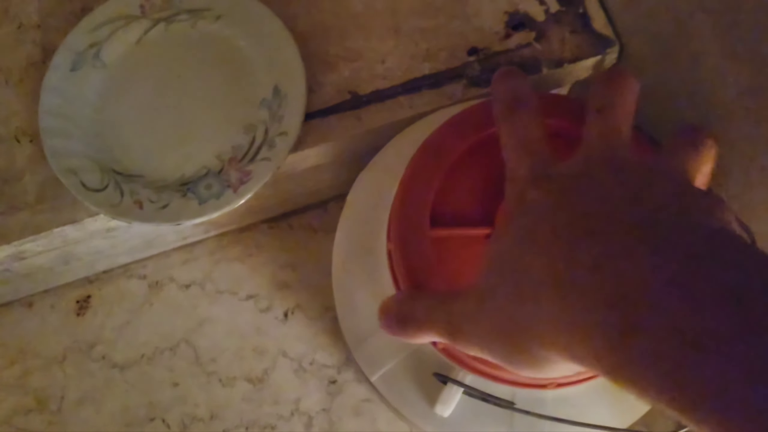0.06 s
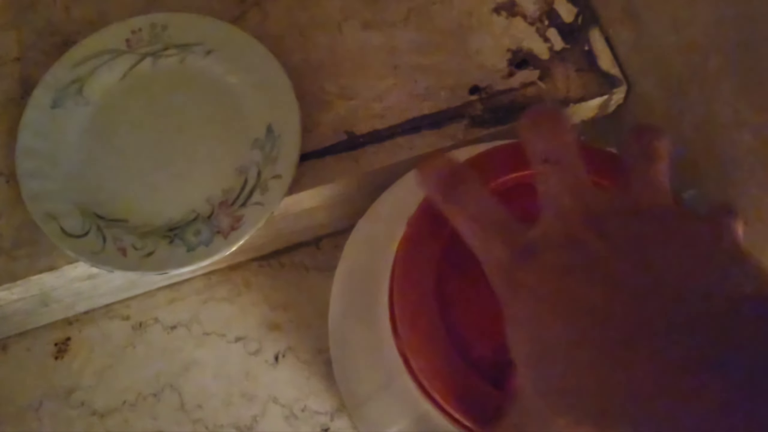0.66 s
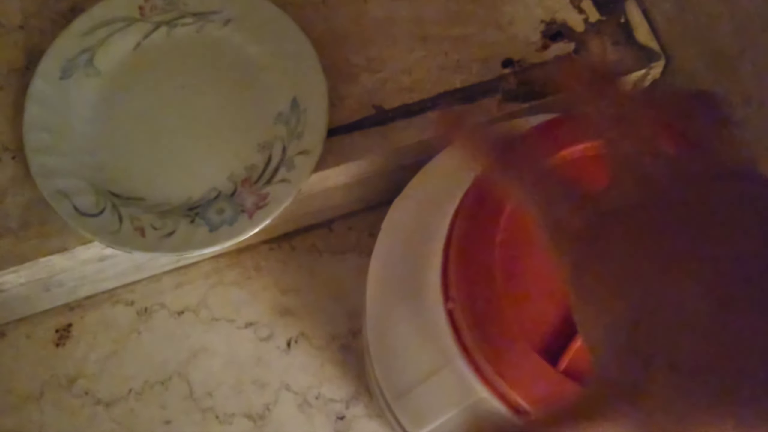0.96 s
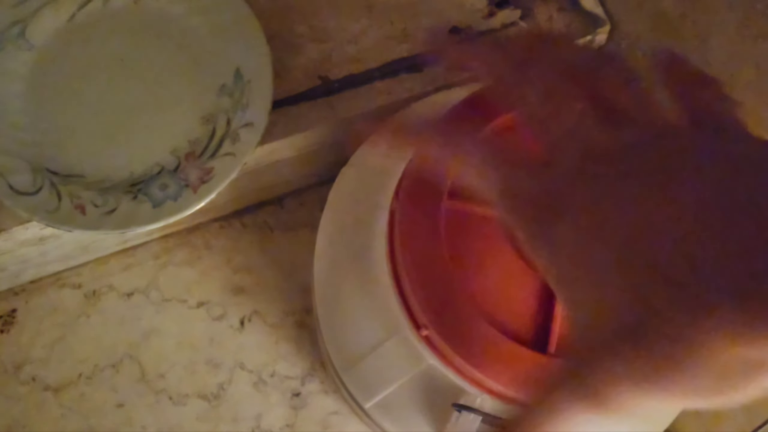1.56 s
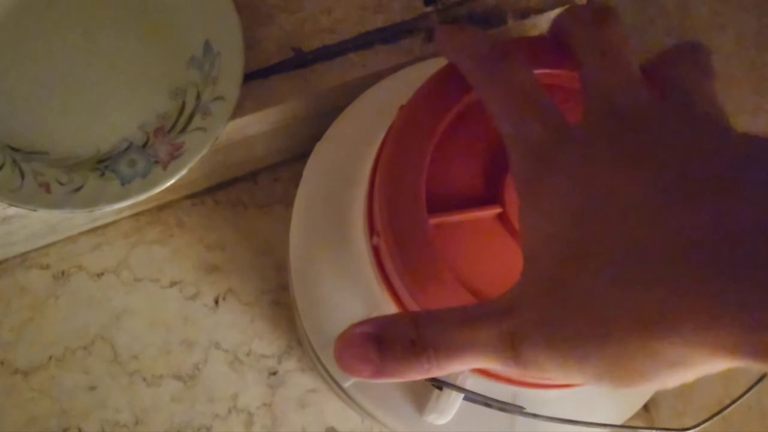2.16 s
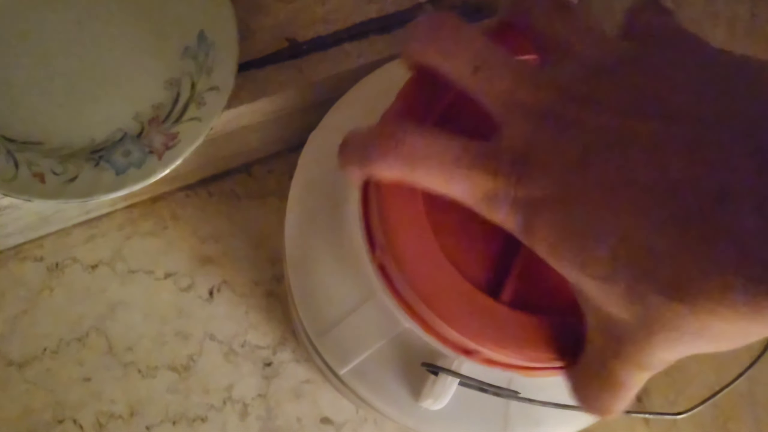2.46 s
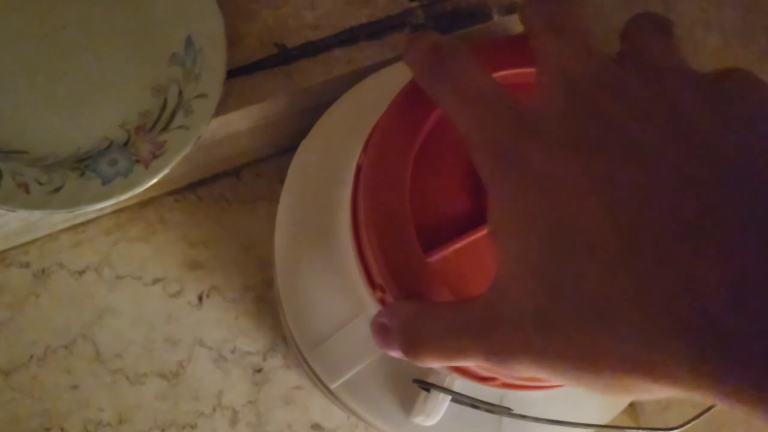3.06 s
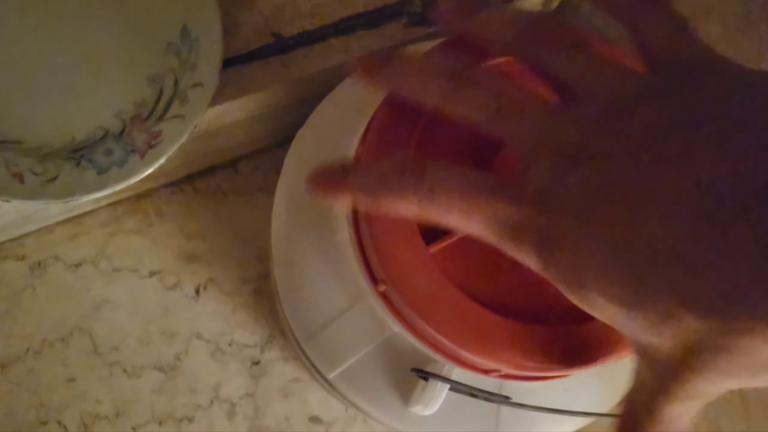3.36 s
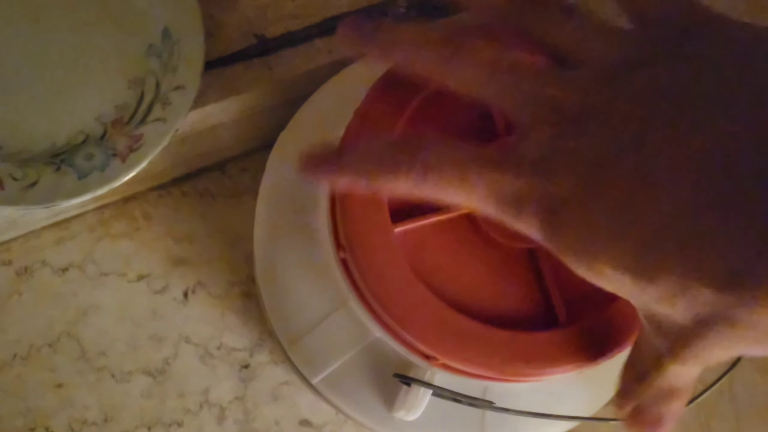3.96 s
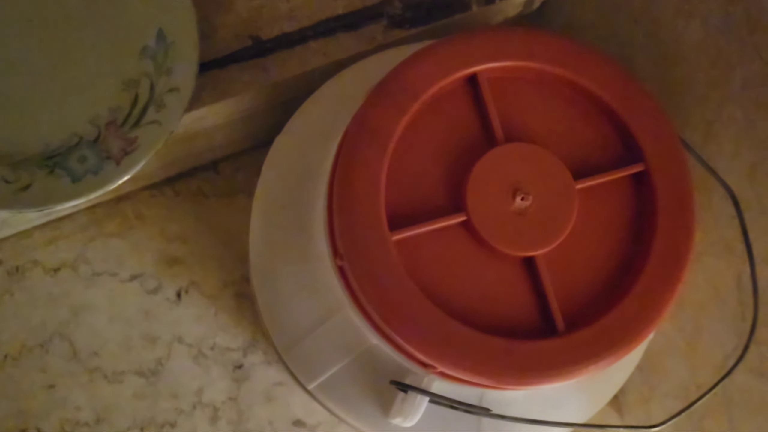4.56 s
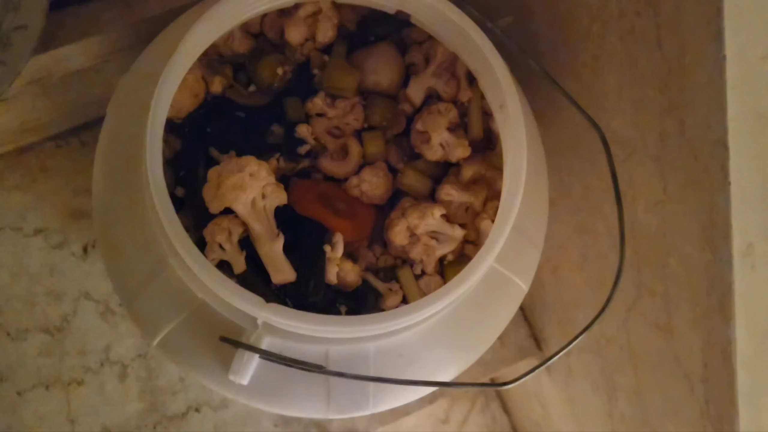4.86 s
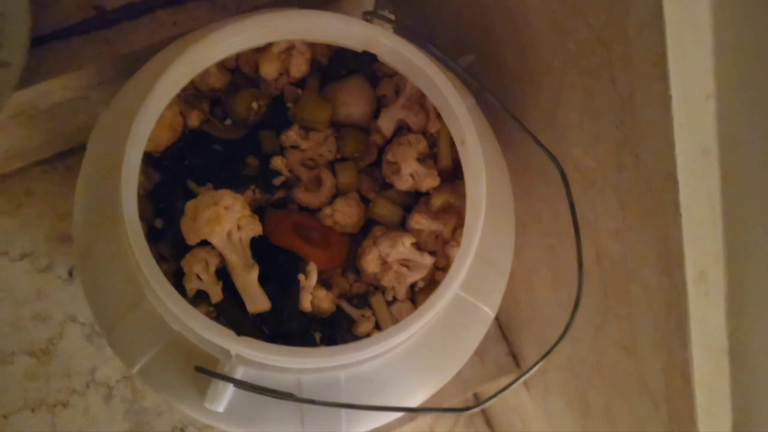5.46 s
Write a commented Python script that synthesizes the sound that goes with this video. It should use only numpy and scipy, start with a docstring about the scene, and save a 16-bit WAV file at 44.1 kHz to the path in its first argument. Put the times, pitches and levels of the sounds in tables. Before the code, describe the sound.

From the start, a hand rummages through dry snack pieces in a plastic jar on a kitchen counter, close to the microphone and a little left. Runs of short pushes come about every half second, the pieces scraping and crunching against the hollow wall. The jar rumbles on the counter and is bumped repeatedly, with clacks, thumps and low booms, the strongest near 2.2 seconds. A piece snaps with a bright tick around 2.4 seconds. The rummaging ends at about 4 seconds, and the hand withdraws with a soft, crumbly rustle on the right. There, from about 4.3 to 4.9 seconds, a few pieces click lightly on a ceramic plate, which rings faintly and thuds softly on the counter. Faint finger rubbing follows until around 5.5 seconds. A short room echo, a low hush and a faint thin whine sit behind everything.

```python
"""At a kitchen counter, microphone close to a plastic jar of dry snack pieces, the jar a little to the left.
A hand rummages in runs of short pushes: the pieces scrape and ring the wall, and the jar rumbles on the
counter, is bumped and booms. Then the hand withdraws with a soft rustle on the right, where a few pieces
click on a ceramic plate. Behind it all are a short room echo, a low hush and a faint whine."""
import sys
import numpy as np
from scipy import signal
from scipy.fft import rfft, irfft, next_fast_len
from scipy.io import wavfile
from scipy.ndimage import uniform_filter1d, map_coordinates

SR = 44100
rng = np.random.default_rng(int(sys.argv[2]) if len(sys.argv) > 2 else 0)


def waveform_to_disk(signal):
    """Save audio, clipped to [-1, 1], as 16-bit WAV at the path in sys.argv[1]."""
    frames = np.transpose(np.atleast_2d(signal))
    scaled = np.clip(frames, -1, 1) * 32767
    samples = np.round(scaled).astype(np.int16)
    wavfile.write(sys.argv[1], SR, samples)


N = 242550


def amp(db):
    """Decibels to gain."""
    return 10 ** (np.asarray(db) / 20)


def unit(x):
    """Scaled to rms 1."""
    return x / np.sqrt(np.mean(x ** 2) + 1e-20)


def along(points, hz):
    """Read (freq_hz, value) points on a log frequency axis."""
    freqs, values = np.transpose(points)
    return np.interp(np.log(hz + 1), np.log(freqs + 1), values)


def wobble(knots_per_s):
    """A smooth random curve."""
    return map_coordinates(rng.standard_normal(4096), [np.arange(N) * knots_per_s / SR], mode="wrap")


def filtered(x, response):
    """x through a complex response of frequency."""
    n = x.shape[-1]
    padded = 2 * next_fast_len(n // 2 + 4096)
    return irfft(rfft(x, padded) * response(np.fft.rfftfreq(padded, 1 / SR)), padded)[..., :n]


def colour(points):
    """Causal response through (freq_hz, level_db) points."""
    def response(hz):
        cepstrum = irfft(np.log(amp(along(points, hz))))
        cepstrum[1:len(cepstrum) // 2] *= 2
        cepstrum[len(cepstrum) // 2 + 1:] = 0
        return np.exp(rfft(cepstrum))
    return response


def resonances(modes):
    """Response of (pitch_hz, width_hz, level_db) modes of alternating sign, each with its bass cut."""
    def response(hz):
        total = 0
        for k, (pitch, width, db) in enumerate(modes):
            peak = pitch * width / (pitch ** 2 - hz ** 2 + 1j * hz * width)
            bass_cut = 1j * hz / (pitch / 2 + 1j * hz)
            total += (-1) ** k * amp(db) * peak * bass_cut
        return total
    return response


def add(track, start_s, sound):
    """Mix a sound into the track."""
    part = track[..., max(round(start_s * SR), 0):][..., :sound.shape[-1]]
    part += sound[..., :part.shape[-1]]


def grains(per_s, scatter_db):
    """Tiny random contacts; each takes two paths to the microphone, with its own strength on each."""
    hits = rng.random(N) < per_s / SR
    return hits * amp(scatter_db * rng.standard_normal(N)) * rng.standard_normal((2, N))


def burst(response, t60_s, rise_s):
    """A short crush of noise through a response; its loudest 5 ms have rms 1."""
    t = np.arange(SR // 5) / SR
    envelope = amp(-60 * t / t60_s) * (1 - np.exp(-t / rise_s))
    noise = filtered(rng.standard_normal((2, len(t))) * envelope, response)
    power = uniform_filter1d(noise ** 2, size=220, mode="constant")
    return noise / np.sqrt(power.max(1, keepdims=True))


def thump(pitch_hz, t60_cycles, rise_cycles):
    """A soft push that swings for a few cycles, peak 1."""
    cycles = pitch_hz * np.arange(SR // 5) / SR
    envelope = amp(-60 * cycles / t60_cycles) * (1 - np.exp(-(cycles / rise_cycles) ** 2))
    swing = -np.sin(2 * np.pi * cycles) * envelope
    return swing / np.abs(swing).max()


def swell(start_s, rise_s, hold_s, fall_db_per_s):
    """Gain of one gesture, every 32nd sample: a smooth rise, a hold and an exponential fall."""
    t = np.arange(0, N, 32) / SR - start_s
    gain = np.sin(np.pi / 2 * np.clip(t / rise_s, 0, 1)) ** 2
    return gain * amp(-fall_db_per_s * np.maximum(t - rise_s - hold_s, 0))


def together(gains):
    """The gains of independent gestures add in power; one value per sample."""
    total = np.sqrt(np.sum(np.square(gains), axis=0))
    return np.interp(np.arange(N), np.linspace(0, N, len(total)), total)


# Pushes of the hand in the jar, levels relative: start_s, rise_s, hold_s, scrape_db, wall_drive_db
PUSHES = [(0.0, 0.0033, 0.076, -53, -40), (0.098, 0.039, 0.029, -32, -27), (0.175, .03, 0.082, -33, -30.5),
          (0.508, 0.025, 0.08, -67, -44.5), (0.601, 0.064, 0.031, -33, -28.5),
          (0.684, 0.058, 0.04, -30.5, -28), (1.092, .01, 0.064, -61, -44.5),
          (1.134, 0.083, 0.039, -36, -31.5), (1.23, 0.037, 0.051, -32.5, -29),
          (1.337, 0.044, 0.023, -32, -29.5), (1.671, 0.019, 0.02, -41.5, -30),
          (1.767, 0.046, 0.084, -36, -31), (1.87, 0.022, 0.03, -32.5, -32),
          (1.93, 0.027, 0.039, -36.5, -33), (2.15, 0.073, 0.11, -51, -37.5),
          (2.292, 0.041, 0.022, -35, -29), (2.378, 0.045, 0.074, -42, -34), (2.476, 0.033, 0.024, -37, -29),
          (2.575, 0.032, 0.038, -43.5, -36), (2.917, 0.007, 0.042, -55, -41.5),
          (3.085, .016, 0.06, -41, -34), (3.124, 0.051, 0.047, -34.5, -30), (3.208, .03, 0.064, -39.5, -34),
          (3.486, 0.038, 0.037, -56, -41), (3.611, 0.042, 0.0081, -34, -27),
          (3.711, 0.043, 0.0061, -30.5, -26.5), (3.806, 0.024, 0.008, -36.5, -30.5),
          (3.9, .022, 0.01, -45.5, -38)]


def pushes():
    """Scrape level and wall drive in dB: each push swells, dies fast and leaves the heap settling."""
    def level(column, release_db_per_s, settle_db, settle_db_per_s):
        gains = []
        for row in PUSHES:
            push = swell(*row[:3], release_db_per_s)
            settling = amp(settle_db) * swell(*row[:3], settle_db_per_s)
            gains.append(amp(row[column]) * np.maximum(push, settling))
        return 20 * np.log10(together(gains) + 1e-9)
    scrape_db = level(column=3, release_db_per_s=320, settle_db=-15.5, settle_db_per_s=67.5)
    wall_db = level(column=4, release_db_per_s=158, settle_db=-7.5, settle_db_per_s=66.8)
    return scrape_db, wall_db


def pings(per_s, pitch_hz, spread, t60_s, scatter_db):
    """Brittle pieces ring for 40 ms, each at its own pitch."""
    starts = np.flatnonzero(rng.random(N) < per_s / SR)
    draws = rng.standard_normal((len(starts), 4))  # pitch, level and the two path gains
    age = np.arange(SR // 25)
    hz = np.minimum(pitch_hz * np.exp(spread * draws[:, :1]), SR / 3)
    rings = amp(scatter_db * draws[:, 1:2] - 60 * age / SR / t60_s) * np.sin(2 * np.pi * hz * age / SR)
    samples = (starts[:, None] + age).ravel()
    return np.array([np.bincount(samples, (rings * gain[:, None]).ravel(), N)[:N]
                     for gain in draws[:, 2:].T])


# Pieces grating on plastic, heard close: freq_hz, level_db
GRIT_SPECTRUM = [(150, -28), (400, -21.5), (1000, 4.5), (2400, -3), (3200, -1), (3900, -3), (5200, -0.5),
                 (6300, -3), (7600, -2.5), (8700, -12), (9600, -10.5), (11000, -14.5), (16000, -14.5)]
# Pieces jostling each other: freq_hz, level_db
JOSTLE_SPECTRUM = [(200, -29), (380, -1.5), (560, -1), (950, -3), (1300, -5.5), (1900, -3), (2250, -8.5),
                   (2600, -10.5), (6000, -34)]
# The jar's wall and cavity: pitch_hz, width_hz, level_db
WALL_MODES = [(442, 21, -8.5), (578.8, 28.6, 4), (613.7, 182, -2.5), (776, 46.4, 2.5), (799, 99, -1.5),
              (1140, 66, -2.5), (1376, 125, 2), (1404.3, 105, 1.5), (1658, 120, -9), (1742, 90, -8),
              (2200, 143, -12), (2314, 80, -8.5)]


def scraping(scrape_db, wall_db):
    """Dry pieces grate along the wall: harder pushes make denser contacts and set the wall ringing."""
    contacts_per_s = 9000 * amp(0.23 * np.clip(scrape_db + 38, -30, 6))
    grip = amp(1.1 * wobble(70))  # the pieces catch and slip
    contacts = grains(contacts_per_s, scatter_db=0) / np.sqrt(contacts_per_s) * grip
    grit = unit(filtered(contacts, colour(GRIT_SPECTRUM)))
    chips = amp(-8) * unit(pings(per_s=600, pitch_hz=5114, spread=0.17, t60_s=0.068, scatter_db=-2))
    chunks = amp(-10.5) * unit(pings(per_s=250, pitch_hz=1888, spread=0.33, t60_s=0.12, scatter_db=3.5))
    # firm pushes ring the wall; light ones mostly jostle the pieces, with no pitch
    firmness = np.clip((wall_db + 56.5) / 24, 0.1, 0.9)
    wall = np.sqrt(firmness) * unit(filtered(contacts, resonances(WALL_MODES)))
    jostle = np.sqrt(1 - firmness) * unit(filtered(grains(5000, scatter_db=1.5), colour(JOSTLE_SPECTRUM)))
    return amp(scrape_db + 2.5) * (grit + chips + chunks) + amp(wall_db - 4) * (wall + jostle)


# Low resonances of jar and counter: pitch_hz, width_hz, level_db
BODY_MODES = [(73, 7.3, 0.5), (121.5, 8.4, 1.5), (146.5, 67, -5.5), (205.7, 38.3, 0.5), (236.3, 27, -3.5),
              (284.9, 8.7, 0)]


def dragging(wall_db):
    """The harder the wall is pushed, the louder the jar rumbles as it slips on the counter."""
    firm_push_db, firm_rumble_db = -28.5, -33.5
    rumble_db = firm_rumble_db + 0.62 * (wall_db - firm_push_db)
    slip_colour = colour([(25, -26.5), (60, 5), (200, 3), (290, -3.5), (360, -2.5), (600, -19)])
    slips = filtered(grains(900, scatter_db=4.5), slip_colour)
    return amp(rumble_db) * unit(filtered(slips, resonances(BODY_MODES)))


# Finger slides, right of the microphone: start_s, rise_s, hold_s, t60_s, rub_db, sift_db
FINGER_SLIDES = [(0.0, .02, 0.093, .3, -78, -56.5), (0.18, .08, 0.12, 0.23, -82, -48.5),
                 (0.466, 0.023, 0.041, 0.63, -79, -58.5), (0.76, .08, 0.061, .3, -77, -52.5),
                 (0.978, 0.018, 0.083, 0.54, -62, -57), (1.4, 0.055, 0.081, 0.35, -80, -57.5),
                 (1.88, 0.098, 0.11, 0.58, -80, -52.5), (2.121, 0.057, 0.41, .4, -80, -51.5),
                 (2.93, 0.023, 0.15, .2, -84, -60.5), (3.48, 0.018, 0.027, 0.17, -84, -59),
                 (3.846, 0.069, 0.16, 0.75, -78, -52), (4.137, .06, .04, 0.54, -72.5, -63),
                 (4.332, 0.019, 0.035, 0.35, -61, -55), (4.454, 0.018, 0.014, .28, -56.5, -77),
                 (4.544, .03, .08, .2, -71, -83.5), (4.731, 0.0083, 0.02, .12, -74, -68.5),
                 (4.901, 0.0083, 0.011, 0.25, -81.5, -70.5), (5.24, .05, 0.01, 0.095, -61, -65.5),
                 (5.308, 0.021, 0.017, 0.27, -68, -70.5), (5.447, 0.015, .01, 0.14, -67.5, -66)]
# Skin rubbing: freq_hz, level_db
RUB_SPECTRUM = [(200, -13), (700, -15), (1200, -5.5), (1800, 4), (2400, -1), (3500, 0.5), (5500, -6.5),
                (7600, -5), (9500, -13.5), (16000, -15.5)]
# Crumbs sifting: freq_hz, level_db
SIFT_SPECTRUM = [(1000, -25.5), (4000, -3.5), (7500, -1.5), (9500, -6.5), (13000, -5), (16000, -5.5)]


def fingers():
    """Fingers rub softly and fine crumbs sift off them."""
    slides = np.array([swell(start, rise, hold, 60 / t60) for start, rise, hold, t60, *_ in FINGER_SLIDES])
    *_, rub_db, sift_db = np.transpose(FINGER_SLIDES)
    rub = unit(filtered(grains(12000, scatter_db=3.5), colour(RUB_SPECTRUM)))
    sift = unit(filtered(grains(12000, scatter_db=2.5), colour(SIFT_SPECTRUM)))
    return together(amp(rub_db)[:, None] * slides) * rub + together(amp(sift_db)[:, None] * slides) * sift


# Bumps of the jar, levels relative: start_s, clack_db, thump_db, thump_hz, crunch_db
JAR_BUMPS = [(0.003, -28, -28, 204, -40), (0.052, -31, -27, 115, -37.5), (0.117, -18.5, -42.5, 264, -32.5),
             (0.128, -17, -24.5, 212, -35), (0.307, -21, -30, 180, -25.5), (0.44, -28.5, -24, 238, -52),
             (0.467, -39, -29, 260, -56), (0.506, -28, -30.5, 172, -45), (0.577, -16.5, -19.5, 216, -31),
             (0.86, -45.5, -39, 190, -44.5), (0.893, -34, -40.5, 183, -44), (0.993, -34.5, -35.5, 120, -48),
             (1.058, -43.5, -32, 114, -51.5), (1.103, -29.5, -32, 88, -40.5), (1.231, -14, -29.5, 84, -27),
             (1.275, -28, -30, 76.4, -27.5), (1.499, -34.5, -27.5, 114, -50),
             (1.687, -16, -22.5, 137, -35.5), (1.703, -17, -34.5, 187, -29.5),
             (1.722, -25, -27.5, 125, -52), (1.772, -43, -28, 152, -53.5), (2.18, -28, -34.5, 135, -50.5),
             (2.243, -17.5, -16, 190, -25), (2.288, -23, -22, 119, -39.5), (2.407, -23.5, -30.5, 128, -38),
             (2.515, -26.5, -31, 114, -38), (2.584, -28.5, -35.5, 189, -48),
             (2.679, -21.5, -26.5, 114, -41.5), (2.762, -33.5, -37.5, 115, -56.5),
             (2.931, -37.5, -24.5, 136, -52), (2.941, -25.5, -31, 170, -36), (2.981, -31.5, -29, 170, -57),
             (3.05, -43, -34.5, 171, -51.5), (3.104, -25, -32.5, 112, -40), (3.174, -25, -33, 135, -24),
             (3.493, -35, -34, 103, -45), (3.528, -26, -27.5, 111, -40), (3.626, -30, -34, 73, -43),
             (3.651, -21, -28.5, 115, -33), (3.661, -17.5, -27.5, 109, -22),
             (3.737, -21.5, -27, 101, -34.5), (3.926, -26, -38.5, 106, -40)]
# A knock on the plastic: freq_hz, level_db
KNOCK_SPECTRUM = [(250, -21), (500, 5.5), (800, 0.5), (1000, -14.5), (1300, 4), (2200, -17.5), (5000, -30)]
# Pieces being crushed: freq_hz, level_db
CRUNCH_SPECTRUM = [(200, -25), (1000, -2.5), (2400, 3.5), (5000, 5), (7500, 1.5), (9000, -18), (16000, -34)]


def bumps():
    """Each bump thumps the jar, clacks its wall and crushes a few pieces."""
    out, t = np.zeros((2, N)), np.arange(SR // 5) / SR
    clack = filtered(np.exp(-t / 0.000089), resonances(WALL_MODES))
    clack /= np.abs(clack).max()
    for start, clack_db, thump_db, thump_hz, crunch_db in JAR_BUMPS:
        force = t * np.exp(-t * thump_hz / 0.087)  # soft, low bumps press longer
        body = filtered(force, resonances(BODY_MODES))
        add(out[0], start + 0.001, amp(clack_db - 3) * clack)
        add(out, start, amp(clack_db - 11.5) * burst(colour(KNOCK_SPECTRUM), t60_s=0.049, rise_s=0.000088))
        add(out, start, amp(crunch_db - 6) * burst(colour(CRUNCH_SPECTRUM), t60_s=0.041, rise_s=0.00033))
        add(out[0], start, amp(thump_db + 1.5) * body / np.abs(body).max())
        add(out[0], start - 0.0015, amp(thump_db + 7) * thump(thump_hz, t60_cycles=5.04, rise_cycles=0.47))
    return out


# Blows that leave the jar free to ring: start_s, level_db, t60_s
JAR_BOOMS = [(0.051, -28.5, 0.88), (0.6, -33.5, 2.4), (1.501, -36, 2), (2.241, -23.5, 1.2),
             (2.516, -33.5, .5), (2.682, -26.5, 0.91), (3.19, -28.5, 0.41), (3.501, -30, 0.99)]


def booming():
    """Left free after a blow, the jar rings out on one low note, wavering a little."""
    pitch_hz, rise_s = 108, 0.0142
    gain = together([amp(db) * swell(start, rise_s, 0, 60 / t60) for start, db, t60 in JAR_BOOMS])
    phase = 2 * np.pi * np.cumsum(pitch_hz * (1 + 0.02 * wobble(20))) / SR
    note = unit(np.sin(phase) + 0.048 * np.sin(2 * phase))
    return np.outer([1, 0], gain * note)  # first path only


# Single pieces breaking, levels relative: start_s, level_db
PIECE_SNAPS = [(2.434, -17), (2.838, -49), (4.739, -42), (4.906, -54)]


def snaps():
    """A dry piece snaps with a bright tick."""
    out = np.zeros((2, N))
    bright = colour([(2000, -18), (8000, -12), (16000, -18)])
    for start, db in PIECE_SNAPS:
        add(out, start, amp(db - 13.5) * burst(bright, t60_s=0.008, rise_s=0.0008))
    return out


# Pieces set on the plate, right of the microphone, levels relative: start_s, click_db, thud_db
PLATE_CLICKS = [(4.3323, -38.5, -31.5), (4.349, -34.5, -34.5), (4.473, -48, -64), (4.7381, -66, -49.5),
                (4.906, -65, -59)]
# The tap of a piece on ceramic: pitch_hz, width_hz, level_db
TAP_MODES = [(660, 1600, -6.5), (1828, 130, 6.5), (2580, 371, -7), (3140, 300, -1.5), (4460, 870, -10.5),
             (7550, 1200, -21), (12500, 4900, -23.5)]
# The plate's ring: pitch_hz, level_db, t60_s
PLATE_MODES = [(1713, 3, .11), (2950, -7, 0.91), (4550, -3, 0.13), (7700, -1, 0.11)]
# The plate nudged on the counter, levels relative: start_s, level_db
PLATE_NUDGES = [(4.458, -44), (4.546, -47), (4.626, -47.5), (4.652, -45.5), (4.75, -43), (4.815, -45)]


def plate():
    """Light pieces click on the plate, which thuds and rocks on the counter and rings faintly."""
    out, t = np.zeros((2, N)), np.arange(SR) / SR
    for start, click_db, thud_db in PLATE_CLICKS:
        ring = sum(amp(db + rng.normal(0, 1.7, (2, 1)) - 60 * t / t60) * np.sin(2 * np.pi * hz * t)
                   for hz, db, t60 in PLATE_MODES)
        add(out, start, amp(click_db - 4) * burst(resonances(TAP_MODES), t60_s=0.013, rise_s=0.000306))
        add(out, start, amp(click_db - 20.5) * ring)
        add(out[0], start, amp(thud_db + 7) * thump(pitch_hz=88, t60_cycles=6, rise_cycles=0.15))
    for start, db in PLATE_NUDGES:
        add(out[0], start, amp(db + 3) * thump(pitch_hz=62.3, t60_cycles=8.3, rise_cycles=0.6))
    return out


# Room tone behind the counter: freq_hz, level_db
HUSH_SPECTRUM = [(25, -0.5), (66, 4.5), (200, -20.5), (300, -19), (600, -36.5), (2400, -38), (4500, -41),
                 (6000, -44), (8000, -41), (10500, -52), (12600, -40.5), (15500, -45.5)]
# A thin whine in the room: pitch_hz, width_hz, level_db
WHINE_BAND = [(2850, 160, 0)]


def room_tone():
    """A low hush and a faint whine, both steady noise."""
    hush = amp(-57) * unit(filtered(rng.standard_normal((2, N)), colour(HUSH_SPECTRUM)))
    whine = amp(-82) * unit(filtered(rng.standard_normal((2, N)), resonances(WHINE_BAND)))
    return hush + whine


# The kitchen's decay, heard from the counter: freq_hz, t60_s
ROOM_DECAY = [(150, 0.24), (400, 0.43), (1800, 0.33), (2200, 0.65), (2600, 0.53), (6000, 0.24),
              (15000, 0.071)]


def room_echo(near):
    """The kitchen's short answer, high treble dying first."""
    hz, t, spectra = signal.stft(rng.standard_normal((2, SR // 2)), SR, nperseg=256)
    tail = signal.istft(spectra * amp(-60 * t / along(ROOM_DECAY, hz)[:, None]), SR, nperseg=256)[1]
    delayed = np.pad(tail, ((0, 0), (200, 0))) / np.linalg.norm(tail[0])
    return signal.fftconvolve(near, delayed, axes=1)[:, :N]


# Likeness of left and right at the microphone: freq_hz, likeness (1 or more is identical)
STEREO_LIKENESS = [(200, 5), (600, 0.8), (1200, 0.38), (2500, -0.07), (6000, 0), (14000, 0)]


def place(paths, balance):
    """Two paths become mid and side: bass alike in both channels, treble unrelated, leaning by balance."""
    def mid_side_gains(hz):
        angle = np.arccos(np.clip(along(STEREO_LIKENESS, hz), -1, 1)) / 2
        return np.array([np.cos(angle), np.sin(angle)])
    mid, side = filtered(paths, mid_side_gains)
    left_right = np.array([mid + side, mid - side])
    return filtered(left_right, lambda hz: amp(np.outer([0.5, -0.5], along(balance, hz))))


# The jar, close and a little left: freq_hz, left_minus_right_db
JAR_BALANCE = [(100, 2), (450, -0.5), (750, 1.5), (1200, 6), (2200, 3), (3800, 3), (5200, 4.5),
               (7500, -0.5), (9000, -4), (11500, -0.5), (16000, -4.5)]
# Fingers and plate, off to the right: freq_hz, left_minus_right_db
HAND_BALANCE = [(200, -7), (1500, -8), (5000, -8.5), (10000, -6)]


def scene():
    """From the microphone: jar to the left, hand and plate to the right, a quiet kitchen behind."""
    scrape_db, wall_db = pushes()
    jar = scraping(scrape_db, wall_db) + dragging(wall_db) + booming() + bumps() + snaps()
    near = place(jar, JAR_BALANCE) + place(plate() + fingers(), HAND_BALANCE)
    return near + room_tone() + amp(-11) * room_echo(near)


def record(dry):
    """The microphone thins the deepest bass; the recorder keeps nothing above its band limit."""
    low_hz, top_hz = 28, 15900
    return filtered(dry, lambda hz: (1j * hz / (low_hz + 1j * hz)) ** 2 * (hz < top_hz))


dry = scene()
out = record(dry)
waveform_to_disk(out)
```